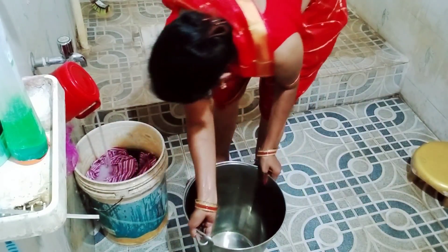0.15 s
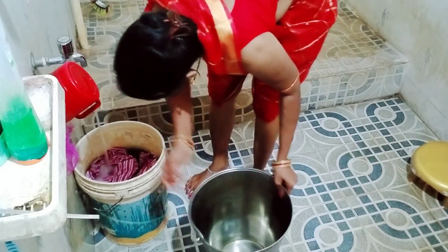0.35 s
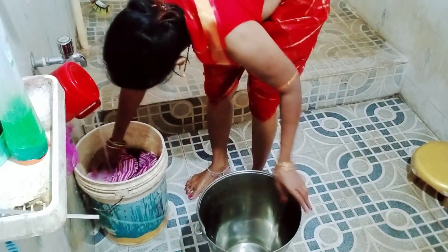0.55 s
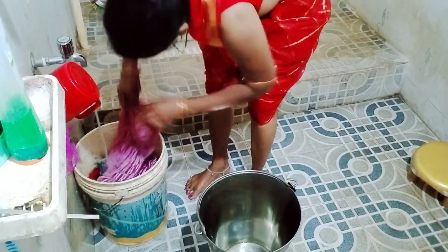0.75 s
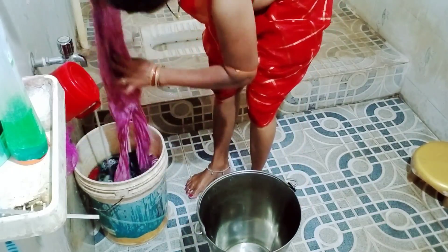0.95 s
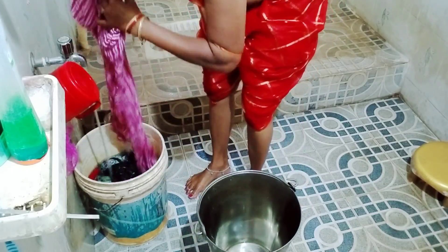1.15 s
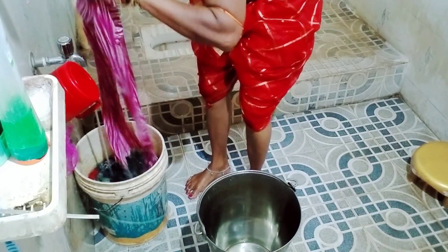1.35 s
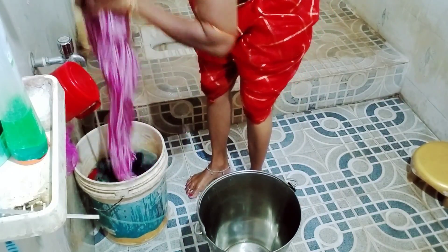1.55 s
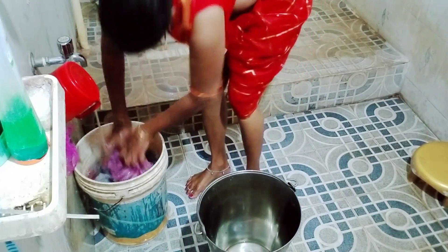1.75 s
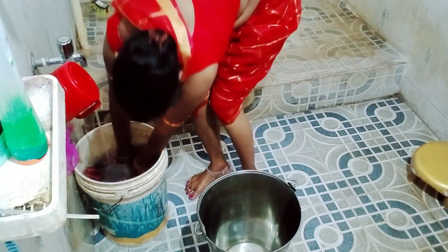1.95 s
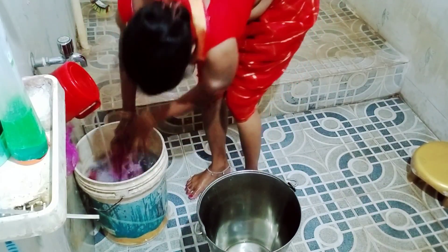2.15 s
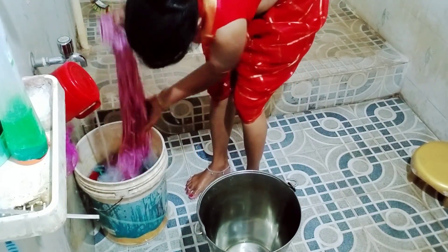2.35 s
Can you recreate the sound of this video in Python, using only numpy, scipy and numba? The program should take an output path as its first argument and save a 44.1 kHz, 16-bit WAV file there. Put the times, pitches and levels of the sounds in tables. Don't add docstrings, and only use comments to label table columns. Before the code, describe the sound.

A steel pot dominates: after faint trickling and hum, it drags over tiles from 0.24 seconds in two juddering, gritty, ringing pulls, lands with a clank near 0.48, its handle clinking, and rocks still by 0.75. Wet cloth then drips and sprays, slapping water around 1.1 and 1.6; bangles chink faintly at 1.73. Heavier plunges, plops and gurgles follow from 1.92 to the end, echoing in the small bathroom.

```python
import sys
import numpy as np
from scipy import signal
from scipy.fft import rfft, irfft
from scipy.io import wavfile
from scipy.ndimage import uniform_filter1d, map_coordinates
from numba import njit

SR = 44100
rng = np.random.default_rng(int(sys.argv[2]) if len(sys.argv) > 2 else 0)


def level_to_linear(level):
    exponent = np.asarray(level, float) / 20
    return 10 ** exponent


def master_out(mix):
    frames = np.transpose(np.atleast_2d(mix))
    ceiling = np.clip(frames, -1, 1)
    pcm = np.round(ceiling * 32767).astype(np.int16)
    wavfile.write(sys.argv[1], SR, pcm)


N = 110250
T = np.arange(N) / SR


def unit(x):
    return x / np.sqrt(np.mean(x ** 2))


def curve(rows):
    seconds, db = np.array(rows).T
    return level_to_linear(np.interp(T, seconds, db))


def colour(x, rows):
    hz, db = np.array(rows).T
    bins_hz = np.arange(N // 2 + 1) * SR / N + 1
    gain = level_to_linear(np.interp(np.log(bins_hz), np.log(hz), db))
    return unit(irfft(rfft(x) * gain, N))


def ring(x, modes):
    out, power = 0, 0
    for hz, db, t60 in modes:
        r = np.exp(-np.log(1000) / (max(t60, .01) * SR))
        mode = signal.lfilter([1], [1, -r * np.exp(2j * np.pi * hz / SR)], x).imag
        out = out + level_to_linear(db) * np.sqrt(2 - 2 * r * r) * mode
        power = power + level_to_linear(2 * db)
    return out / np.sqrt(power)


def walk(rate_hz):
    k = int(SR / rate_hz)
    steps = np.repeat(rng.standard_normal(N // k + 1), k)
    return unit(uniform_filter1d(uniform_filter1d(steps, k), k)[:N])


def clicks(rate_hz, spread_db):
    chance, sign, size = rng.random((3, N))
    return unit((chance < rate_hz / SR) * np.sign(sign - .5) * level_to_linear(-spread_db * np.log(size + 3e-3)))


def swell(start, attack, hold, release):
    fade = np.exp(-np.clip(T - start - attack - hold, 0, None) / release)
    return np.clip((T - start) / attack, 0, 1) * fade


def knocks(rows, contact_s):
    return sum(level_to_linear(db) * swell(s, contact_s, 0, contact_s) for s, db in rows)


def lowpass(x, order, hz):
    return signal.sosfilt(signal.butter(order, hz, fs=SR, output="sos"), x)


def highpass(x, hz):
    return signal.sosfilt(signal.butter(2, hz, "high", fs=SR, output="sos"), x)


@njit
def grains(times, hz, cycles, size, glide, count):
    out = np.zeros(count)
    for k in range(len(times)):
        i, phase, f = int(times[k] * SR), 0., hz[k] / SR
        n = int(5 * cycles[k] / f)
        for j in range(min(n, count - i)):
            phase += f * (1 + glide * j / n)
            out[i + j] += size[k] * np.sin(2 * np.pi * phase) * np.exp(-5. * j / n)
    return out


@njit
def limit(x, top, release):
    y, level = np.empty(len(x)), 0.
    for i in range(len(x)):
        a = abs(x[min(i + 40, len(x) - 1)])
        level += (a - level) * (.05 if a > level else release)
        y[i] = x[i] * min(1., top / (level + 1e-9)) ** .8
    return y


# frequency in Hz, density in dB per Hz.
HUM_COLOUR = [(150, -24), (230, -35.5), (320, -35.5), (700, 4), (1000, -15), (3000, -3), (10000, 14),
              (15000, 17)]


def house_hum():
    return colour(rng.standard_normal(N), HUM_COLOUR) * level_to_linear(-52 + .9 * walk(6))


def room(x):
    low_t60_s, high_t60_s, wet_db = 0.29, 0.49, -3.5
    t = T[:SR // 2 + SR // 4]
    noise = rng.standard_normal(len(t))
    low = lowpass(noise, 1, 2000)
    tail = low * level_to_linear(-60 * t / low_t60_s) + (noise - low) * level_to_linear(-60 * t / high_t60_s)
    tail = tail * np.clip(t / 0.016 - .5, 0, 1)
    return x + level_to_linear(wet_db) * signal.fftconvolve(x, tail / np.sqrt(np.sum(tail ** 2)))[:N]


# start in seconds, level in dB, length in seconds.
BANGLE_TAPS = [
    (1.731, -45, 0.0286),
    (1.777, -51.5, 0.011),
]


def bangle():
    contact = sum(level_to_linear(db) * swell(s, .001, length, .002) for s, db, length in BANGLE_TAPS)
    modes = [(12010, -2, 0.032), (12600, -15, .02), (9500, -14, .02)]  # Hz, dB, t60 s
    return ring(rng.standard_normal(N) * contact, modes)


# frequency in Hz, density in dB per Hz.
TRICKLE_COLOUR = [(1000, 7.5), (2500, -34), (3500, 4.5), (5500, 9.5), (7500, 0), (11000, -1.5),
                  (14000, 1.5), (15600, 6.5)]
# start in seconds, level in dB.
SPRAY_PUFFS = [
    (0.809, -47.5),
    (.93, -49),
    (1.10, -66),
    (1.378, -49),
    (1.569, -52),
    (1.678, -45),
    (1.74, -60),
    (1.962, -53),
    (2.04, -53),
]
# time in seconds, stirring in dB, trickle in dB.
STIRRING = [(0, -46, -49), (.2, -50.5, -50), (0.748, -49.5, -51.5), (0.902, -50, -49.5), (1.03, -45.5, -46),
            (1.08, -45.5, -50), (1.11, -42, -42.5), (1.3, -47, -46.5), (1.45, -51.5, -47),
            (1.52, -47, -49.5), (1.6, -43.5, -43), (1.8, -42, -45), (1.85, -47, -48), (1.915, -38, -43.5),
            (1.95, -35.5, -43.5), (2.15, -40.5, -46.5), (2.28, -41.5, -47.5), (2.5, -41, -47.5)]


def trickle():
    flow = curve(np.array(STIRRING)[:, ::2]) * level_to_linear(.8 * walk(14))
    flow = flow + sum(level_to_linear(db) * swell(s, 0.0021, 0.0065, 0.021) for s, db in SPRAY_PUFFS)
    return colour(clicks(12000, 2.34), TRICKLE_COLOUR) * flow


# frequency in Hz, density in dB per Hz.
GURGLE_COLOUR = [(190, -33), (320, 1.5), (450, -2), (680, 10), (1000, 4), (1600, 5), (3000, 5.5), (7000, 2)]


def gurgle(stir):
    count, low_hz, high_hz = 16000, 220., 8000.
    when, pitch, length, size = rng.random((count, 4)).T
    hz = low_hz * (high_hz / low_hz) ** pitch
    bubbles = grains(when * N / SR, hz, 4.5 * (1.5 + length), level_to_linear(-1.8 * np.log(size + 1e-4)), 0.18, N)
    return colour(bubbles, GURGLE_COLOUR) * stir * level_to_linear(1.1 * walk(11))


# start in seconds, level in dB, top pitch in Hz.
CLOTH_SLAPS = [(1.102, -49.5, 2010), (1.229, -58.5, 920), (1.271, -62, 990), (1.537, -57, 2470),
               (1.570, -43.5, 2300), (1.60, -47.5, 1545), (1.676, -40, 2510), (1.701, -52, 1890),
               (1.72, -46, 1700), (1.76, -53, 710), (1.921, -38, 2800), (1.929, -40.5, 2300),
               (1.942, -49.5, 1435), (1.97, -55, 2250), (1.99, -49, 1130), (2.01, -47.5, 2940),
               (2.06, -41.5, 2970), (2.196, -45.5, 730), (2.228, -46.5, 1367), (2.261, -47, 3730),
               (2.28, -57, 636), (2.44, -45, 980)]


def cloth_slaps():
    slap_s, sink_per_s = .027, 53.84
    out = 0
    for s, db, top_hz in CLOTH_SLAPS:
        when, depth, push = rng.random((220, 3)).T
        late = 2.2 * slap_s * when ** 1.2
        sink = sink_per_s * late * (0.288 + 0.706 * depth) + 0.898 * depth ** 2
        hz = top_hz * np.exp(-sink) + 220
        size = 2.2 * (push - .5) * 2 ** .5 * np.exp(-late / .05) * np.clip(.6 + late / .005, 0, 1)
        out = out + level_to_linear(db) * grains(s + late, hz, 5. + 0 * hz, size, .15, N)
    return out


# start in seconds, pitch in Hz, level in dB, length in cycles.
SINGLE_DRIPS = [(.83, 1003, -43.5, 12), (1.27, 773, -37, 9.7), (1.63, 1570, -50, 14), (1.73, 1180, -32, 13),
                (1.945, 447.5, -25.5, 5.4), (1.962, 467, -25.5, 5.8), (2.02, 2880, -35, 22),
                (2.12, 3830, -44, 45), (2.225, 1170, -33.5, 11.5), (2.265, 3540, -42, 68),
                (2.295, 3630, -38.5, 30), (2.285, 455, -31, 7.3), (2.37, 679, -33.5, 12),
                (2.45, 770, -32, 18), (2.48, 686, -44, 18)]


def drips():
    start, hz, db, cycles = np.array(SINGLE_DRIPS, float).T
    return grains(start, hz, cycles, level_to_linear(db), 0.031, N)


# frequency in Hz, level in dB, t60 in seconds.
HOLLOW_MODES = [(227.3, 4.5, 0.22), (313.6, 8, 1), (328, 1, 0.18), (441, 1.5, 0.24), (480.6, -5.5, 0.3),
                (524, 0, 1), (679.4, 8, 0.89), (749, 1, 0.45), (875, 7, 0.4), (1177, -1.5, 0.26),
                (1492, 1, 0.48), (1605, -6.5, 0.51), (2775, -3.5, 0.3)]


def bucket_water():
    stir = curve(np.array(STIRRING)[:, :2])
    splashes = cloth_slaps() + drips()
    drive = colour(clicks(2500, 1.16), [(200, 0), (900, 0.027)]) * stir + splashes * 0.14
    return gurgle(stir) + splashes + level_to_linear(-3) * ring(drive, HOLLOW_MODES)


# frequency in Hz, level in dB, t60 in seconds.
PAIR_MODES = [(840, 0, .55), (852.3, 0, .55)]
# start in seconds, level in dB.
PAIR_KNOCKS = [
    (.545, -9),
]


def wall_pair():
    return ring(knocks(PAIR_KNOCKS, .00008), PAIR_MODES)


# start in seconds, level in dB.
HANDLE_CLINKS = [
    (.487, -20),
    (.515, -17.5),
    (.543, -13),
    (.56, -13.5),
]
# frequency in Hz, level in dB, t60 in seconds.
HANDLE_MODES = [(1230, -6, .12), (1550, -4, .12), (2250, -5, .07), (2850, -1, .07), (3985, -4, .1)]


def handle():
    return ring(knocks(HANDLE_CLINKS, .00004), HANDLE_MODES)


# start in seconds, level in dB, length in seconds, sharpness as a factor.
RIM_SCRAPES = [
    (0.234, -36.5, 0.032, 0.54),
    (0.314, -34.5, 0.051, 0.98),
    (0.426, -36, 0.034, 0.86),
    (0.48, -34, 0.035, 1.55),
    (0.541, -40, 0.0054, 0.32),
    (0.585, -59, 0.017, 0.23),
]
# frequency in Hz, density in dB per Hz.
GRIT_COLOUR = [(530, -51), (900, -33), (1320, -69), (1550, -1), (1950, -12), (3190, -22), (3860, -7.5),
               (13800, -16), (16000, -17.5)]
# frequency in Hz, level in dB, t60 in seconds.
RIM_MODES = [(1185, 0, 0.07), (1425, -4, .1), (1558, 7.5, 0.12), (1787, -5, 0.071), (2300, -3.5, 0.054),
             (3690, 1, 0.039), (3830, 2, 0.036), (3890, 2.5, 0.067), (4810, -2, 0.11), (5370, -1.5, 0.068),
             (6350, -1, 0.029), (6900, -8, 0.041)]


def rim_scrape():
    grind = sum(level_to_linear(db) * swell(s, 0.017, d, 0.019) for s, db, d, _ in RIM_SCRAPES)
    bite = sum(level_to_linear(db) * sharp * swell(s, 0.017, d, 0.0096) for s, db, d, sharp in RIM_SCRAPES)
    grit = clicks(8000, 0.52)
    hiss = colour(grit, GRIT_COLOUR) * level_to_linear(0.94 * walk(41.0))
    dull = lowpass(hiss, 2, 6500)
    return grind * dull + bite * (hiss - dull) + level_to_linear(-3.5) * ring(grind * grit, RIM_MODES)


# start in seconds, level in dB.
LANDING_KNOCKS = [(.476, 7), (.492, -24), (.503, -14), (.515, -25), (.538, -8.5), (.58, -5.5), (.612, -8.5),
                  (.635, -39), (.655, -13.5), (.685, -15.5), (.715, -18.5)]
# time in seconds, level in dB.
ROCKING = [
    (.47, -47),
    (.5, -36),
    (.6, -34),
    (.7, -43.5),
    (.73, -61),
    (.75, -66),
]
# frequency in Hz, level in dB, t60 in seconds.
SETTLED_MODES = [(238, -22, 1), (303.2, -2, 1), (336.6, -14, 0.88), (412, -8, 0.47), (449, 6.5, 0.37),
                 (487.7, -3.5, 0.88), (513, 7, 0.25), (547.3, 3, 0.32), (632, -8.5, 0.077), (683, -1, 0.19),
                 (785, -6.5, 0.23), (852, 4, 0.3), (1242, -3, 0.85)]


def pot_landing():
    rocking = (T > ROCKING[0][0]) * (T < ROCKING[-1][0])
    rattle = clicks(900, 1.3) * curve(ROCKING) * rocking
    return ring(knocks(LANDING_KNOCKS, 0.000083) + rattle, SETTLED_MODES)


# time in seconds, judder in dB.
DRAG_PUSH = [
    (.237, -45),
    (.242, -15),
    (.335, -23.5),
    (.35, -43.5),
    (.375, -30),
    (.398, -49),
    (.43, -16),
    (.465, -23),
    (.50, -33),
]
# start in seconds, low modes in dB, upper modes in dB.
JOINT_JERKS = [(.2385, 1, -7.5), (.247, -3, -13), (.259, -8.5, -10), (.27, -6.5, -8), (.283, -10.5, -1.5),
               (.293, -7, -7.5), (.303, -4.5, -8.5), (.314, 0, -29), (.322, -8.5, -11), (.334, -1.5, -4.5),
               (.346, -19, -20), (.357, -12, -10), (.368, -12.5, -11.5), (0.382, -17, -20),
               (.393, -26, -25), (.413, -6.5, -11.5), (.423, 0.5, -9.5), (.436, -5.5, -10.5),
               (.45, -14, -5), (.462, -2, -16)]
# frequency in Hz, level in dB, t60 in seconds.
TILTED_MODES = [(217, 4, .3), (258.6, 6, 0.26), (328, -19, 0.4), (427, -26, 0.21), (450.7, 8.5, 0.36),
                (497, 16, 0.31), (523.3, 19.5, 0.24), (603, 2, 0.17)]
# frequency in Hz, level in dB, t60 in seconds.
WALL_MODES = [(671, 10.5, 0.19), (710, 5.5, 0.3), (746, 12.5, 0.062), (796.4, 10.5, 0.12), (822, -3, 0.14),
              (820, -24, 0.2)]


def pot_drag():
    dragging = (T > DRAG_PUSH[0][0]) * (T < DRAG_PUSH[-1][0])
    kicks = clicks(1160, 1.8) * curve(DRAG_PUSH) * dragging * level_to_linear(1.5 * walk(50))
    jerks = np.array(JOINT_JERKS)
    low_push = kicks + knocks(jerks[:, :2], 0.0001)
    high_push = level_to_linear(-11.5) * kicks + knocks(jerks[:, ::2], 0.0001)
    body = ring(highpass(low_push, 430), TILTED_MODES) + ring(highpass(high_push, 590), WALL_MODES)
    wobble_s = .0003 * walk(14.3)
    return map_coordinates(body, [(T + wobble_s) * SR], mode="nearest")


def pot():
    body = lowpass(pot_drag() + pot_landing(), 8, 920)
    return body + rim_scrape() + handle()


def scene():
    in_room = room(pot() + bucket_water())
    return (in_room + wall_pair() + bangle() + trickle() + house_hum())[None]


def roll_off(x):
    return signal.sosfilt(signal.butter(12, 16350, fs=SR, output="sos"), x)


def record(dry):
    mic_low_hz, leak_db, limit_db, release_s, bend, top_hz = 185, -35, -9.5, .012, 0.042, 15540
    bass_cut = signal.cheby1(4, .3, mic_low_hz + 60, "high", fs=SR, output="sos")
    heard = signal.sosfilt(bass_cut, dry[0]) + level_to_linear(leak_db) * dry[0]
    held = limit(heard, level_to_linear(limit_db), 1 / (release_s * SR))
    top_cut = signal.ellip(12, .3, 70, top_hz, fs=SR, output="sos")
    mix = signal.sosfilt(top_cut, held + bend * held * held)
    return roll_off(mix[None])


dry = scene()
out = record(dry)
master_out(out)
```